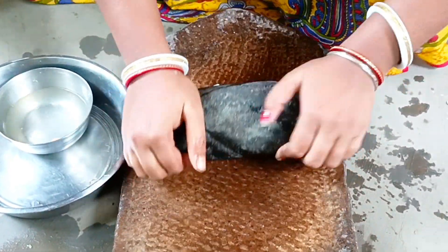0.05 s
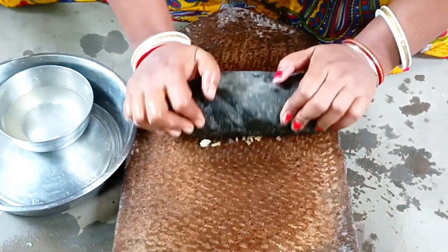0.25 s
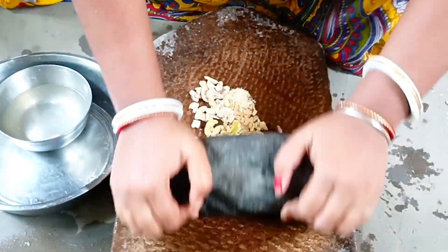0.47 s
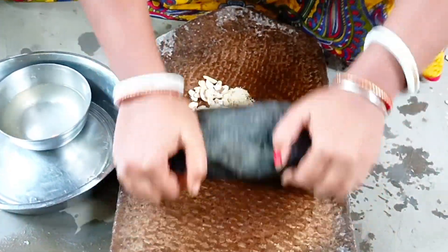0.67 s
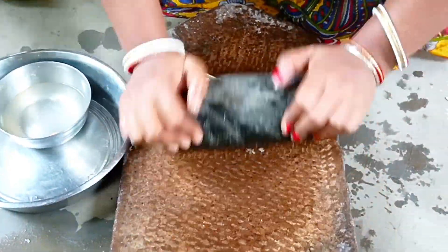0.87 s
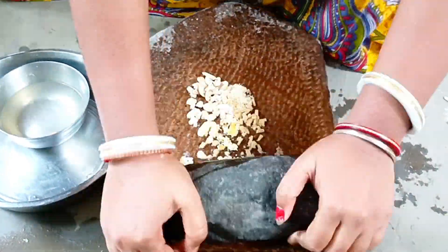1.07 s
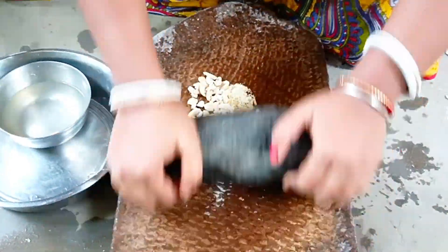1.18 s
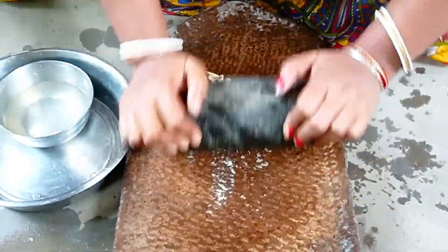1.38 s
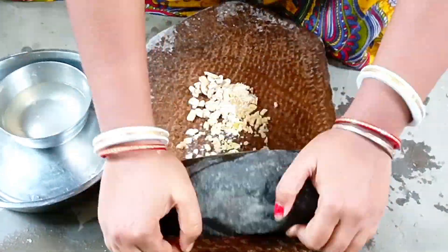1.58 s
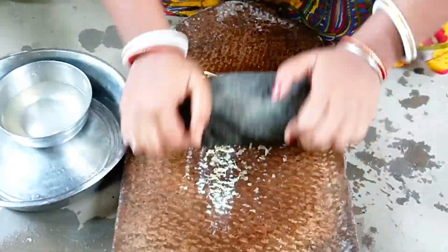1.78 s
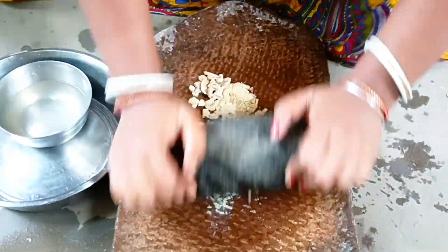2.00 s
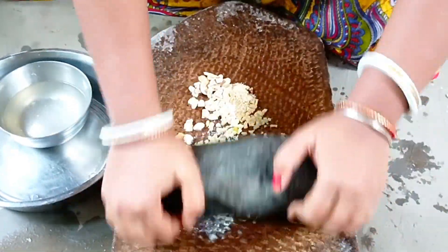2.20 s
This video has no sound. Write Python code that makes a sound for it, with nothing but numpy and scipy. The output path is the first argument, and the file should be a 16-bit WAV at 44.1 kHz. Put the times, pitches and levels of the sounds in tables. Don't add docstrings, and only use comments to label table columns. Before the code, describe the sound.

Stone grinding on stone, quick gritty strokes with hard hollow knocks, crushing dry food up close

```python
import sys
import numpy as np
from scipy import signal
from scipy.fft import rfft, irfft, next_fast_len
from scipy.io import wavfile
from scipy.ndimage import map_coordinates

SR = 44100
rng = np.random.default_rng(int(sys.argv[2]) if len(sys.argv) > 2 else 0)


def boost_factor(decibels):
    exponent = np.asarray(decibels, float) / 20
    return 10 ** exponent


def output_pcm(signal):
    pcm = np.clip(np.atleast_2d(signal).T, -1, 1) * 32767
    wavfile.write(sys.argv[1], SR, np.round(pcm).astype(np.int16))


N = 99225

# start in seconds, length in seconds, level in dB,
# roller ring in dB.
CHATTER_STROKES = [(-.06, 0.13, -27, -7), (0.248, 0.09, -30, -15), (0.361, 0.17, -27, 6),
                   (0.567, 0.098, -31.5, 8.5), (0.614, 0.12, -22, 0.5), (0.842, 0.023, -55, 25),
                   (0.876, 0.12, -25, -16), (0.944, 0.097, -29.5, 6), (1.105, 0.17, -24.5, 3),
                   (1.284, 0.068, -30.5, -25), (1.428, 0.024, -19, -26), (1.483, 0.087, -32, 5.5),
                   (1.628, 0.083, -27, -4.5), (1.752, 0.15, -26, -14), (1.869, 0.21, -25.5, -22),
                   (2.048, 0.082, -42.5, 1.5), (2.181, 0.042, -36.5, 4.5)]
# start in seconds, length in seconds, level in dB,
# cut of the low grit in dB (higher is brighter).
CRUSH_STROKES = [(-.05, 0.2, -84, -24), (.255, 0.19, -44.5, -15), (.4, 0.076, -88, -1),
                 (.72, 0.12, -58, 12), (.835, 0.12, -42, -17), (.9, 0.12, -35.5, -0.5),
                 (1.2, 0.11, -45, -3), (1.29, 0.048, -49.5, -13), (1.345, 0.16, -42, -15),
                 (1.43, 0.15, -38, 2), (1.7, 0.14, -45, -4), (1.815, 0.052, -40, -8),
                 (1.885, 0.14, -43.5, -19.5), (1.97, 0.12, -37.5, -2.5), (2.12, 0.053, -63, -8),
                 (2.19, 0.19, -47.5, -2)]
# start in seconds, peak in dB,
# pitch in Hz, t60 in seconds.
REBOUNDS = [(.010, -24.5, 697, 0.19), (0.013, -23.5, 983, 0.065), (0.211, -19, 259, 0.13),
            (.228, -14, 974, 0.044), (.285, -30.5, 630, 0.098), (.396, -4, 689, 0.05),
            (.42, -12.5, 590, 0.049), (.448, -24, 637, 0.05), (.484, -17.5, 686, 0.078),
            (.575, -31, 710, 0.077), (.626, -18, 940, 0.1), (0.644, -14, 468, 0.017),
            (.664, -11, 916, 0.11), (.698, -14.5, 922, .07), (0.901, -8.5, 593, 0.025),
            (.935, -3.5, 924, 0.052), (0.952, -10, 930, 0.034), (0.973, -13.5, 540, 0.091),
            (.989, -9.5, 580, 0.045), (1.010, -11, 665, 0.054), (1.024, -22, 630, 0.19),
            (1.051, -26, 564, 0.054), (1.142, -15.5, 1010, 0.043), (1.192, -11.5, 896, 0.035),
            (1.214, -14, 973, 0.07), (1.325, -13, 348, 0.026), (1.432, -13.5, 313, 0.03),
            (1.448, -10.5, 967, 0.044), (1.528, -10, 556, 0.03), (1.534, -18.5, 2320, 0.042),
            (1.549, -15, 593, .05), (1.564, -22.5, 665, .06), (1.649, -11.5, 399, 0.038),
            (1.661, -14.5, 406, 0.066), (1.670, -17.5, 1000, 0.028), (1.671, -17, 2390, 0.024),
            (1.680, -15.5, 397, 0.019), (1.823, -12, 910, 0.028), (1.854, -13, 1153, 0.053),
            (1.913, -13.5, 920, 0.027), (1.955, -8.5, 597, 0.043), (1.963, -13, 2330, 0.019),
            (1.977, -12, 905, 0.085), (1.986, -12.5, 927, 0.029), (1.996, -16, 912, 0.052),
            (2.021, -17, 2420, 0.018), (2.103, -27.5, 708, 0.037), (2.167, -21, 408, 0.067),
            (2.209, -29, 680, 0.05), (2.211, -23, 2345, 0.026)]
# start in seconds, peak in dB, pitch in Hz.
TICKS = [(.151, -35, 4840), (0.184, -28, 3000), (.197, -42, 8060), (.265, -35.5, 3900), (.750, -53, 9000),
         (0.774, -40.5, 8000), (.842, -33.5, 11700), (0.859, -22.5, 3000), (1.308, -32.5, 4900),
         (1.352, -31, 12000), (1.53, -28.5, 9000), (1.829, -29, 5100), (1.998, -17, 5700),
         (2.051, -43, 11900), (2.056, -27.5, 9000), (2.138, -46, 9000)]
# start in seconds, peak in dB, loudest slab pitch in Hz,
# roller ring in dB.
KNOCKS = [(.208, 7.5, 1222, 7.5), (0.3457, -2.5, 1000, 6.5), (.379, 10.5, 1310, 4.5), (.661, -17.5, 960, 8),
          (.744, -8.5, 850, -17), (.788, 2, 1110, 3), (0.837, -16.5, 530, -17), (.893, -1.5, 1000, -2),
          (.923, -4.5, 855, -1), (.930, -3, 950, 4.5), (0.972, -12, 597, 9.5), (1.0, -7, 740, -3),
          (1.118, -18, 430, -25), (1.177, -11, 860, 4), (1.283, -20, 357, 5.5), (1.3171, -7.5, 1080, -18),
          (1.364, -13.5, 446, -3), (1.4282, 3, 1060, 5), (1.5108, -2.5, 663, 0.5), (1.632, -24.5, 680, -22),
          (1.766, -18, 830, 7), (1.796, -16, 910, -14), (1.837, -2.5, 1104, 1.5), (1.894, -11, 880, -31),
          (1.944, -1, 1110, -6), (2.082, -18.5, 684, -3), (.858, -16.5, 900, 6.5), (2.192, -21, 677, 8)]
# pitch in Hz, level in dB, t60 in seconds.
ROLLER_MODES = [(929.3, -8, 0.048), (2272, -10, 0.015), (2350, -6, 0.031), (2439, -13.5, 0.025),
                (2670, -22.5, 0.06), (4573, -19.5, 0.018), (5140, -31.5, 0.017), (7270, -34, 0.02),
                (9900, -27, 0.011)]
# pitch in Hz, level in dB, t60 in seconds.
SLAB_MODES = [(259, -9.5, 0.091), (347.5, -7.5, 0.093), (415.5, -6, 0.084), (465, 1, 0.088),
              (554, -1.5, 0.096), (628, 0, 0.084), (688.8, -1.5, 0.11), (810, 2, 0.013),
              (1000, -1.5, 0.055), (1178, 9, 0.019), (1310, -2, 0.038), (1550, -3, 0.045),
              (1694, -3.5, 0.046), (2008, -8, 0.026)]
# frequency in Hz, level in dB.
SCRAPE_COLOUR = [(80, -48), (200, -15.5), (600, 3.5), (2500, -11), (3200, -18), (6000, -33), (10000, -33),
                 (12000, -60)]
# frequency in Hz, level in dB per Hz.
GRIT_COLOUR = [(700, -18), (1500, 0), (3000, 1), (5000, -3.5), (6500, -8.5), (8500, 2), (11000, -9),
               (15000, -13.5)]
# frequency in Hz, level in dB.
THUD_COLOUR = [(25, -42), (50, -15.5), (97, 12.5), (140, 0), (200, 8), (300, -48)]
# frequency in Hz, level in dB.
AIR_COLOUR = [(24, -41), (40, -6), (352, -13), (932, -24.5), (1140, -17), (2870, -27), (5920, -40.5),
              (8620, -38.5), (15700, -58)]
# frequency in Hz, left-right likeness from 0 to 1.
LIKENESS = [(100, 0.93), (500, 0.76), (2000, 0.09), (5000, 0.13), (9000, 0.049)]
# frequency in Hz, t60 in seconds.
ROOM_DECAY = [(200, 0.2), (2000, 0.2), (8000, 0.17)]
# frequency in Hz, left over right in dB, left lead in radians.
PORTS = [(250, -3, 0.12), (450, -1, 0.07), (885, 5.5, 0.2), (1200, -2.5, 0.99), (2420, 3.5, 0.49),
         (9000, -7.5, 1.9)]

PITS_PER_S, PIT_SCATTER_DB = 1500, 3.5
GRITS_PER_S, GRIT_SCATTER_DB = 2800, 9
FALL_DB, BELOW_DB = 10.5, 0.5
GRIP_T60_S, GRIP_SHARE = 0.13, 0.89
NEIGHBOUR_STEP, NEIGHBOUR_DB = 0.11, -12.5
LIGHT_HZ = 157
TOP_HZ = 15800


def unit(x):
    return x / np.sqrt(np.mean(x ** 2) + 1e-20)


def along(points, hz):
    f, value = np.transpose(points)
    return np.interp(np.log(hz + 1), np.log(f + 1), value)


def wobble(rate):
    return map_coordinates(rng.standard_normal(1000), [np.arange(N) * rate / SR])


def filtered(x, response):
    m = next_fast_len(N + SR // 2)
    return irfft(rfft(x, m) * response(np.fft.rfftfreq(m, 1 / SR)), m)[..., :N]


def place(out, start_s, sound):
    out[:, round(start_s * SR):][:, :sound.shape[1]] += sound


def grains(per_s, scatter_db):
    happens = rng.random((2, N)) < per_s / SR
    size = boost_factor(scatter_db * np.minimum(rng.exponential(size=(2, N)), 3.04))
    return unit(happens * size * np.sign(rng.standard_normal((2, N))))


def spread(pair, colour):
    def response(hz):
        turn = np.arccos(np.clip(along(LIKENESS, hz), -1, 1)) / 2
        return boost_factor(along(colour, hz)) * [np.cos(turn), np.sin(turn)]

    mid, side = filtered(pair, response)
    return unit(np.array([mid + side, mid - side]))


def strokes(rows, lag_s=0, sharp=1.73, rise=0.72):
    start, length, db, extra_db = np.transpose(rows)[:, :, None]
    progress = np.clip((np.arange(N) / SR - start - lag_s) / length, 0, 1)
    return np.abs(np.sin(np.pi * progress ** rise)) ** sharp * boost_factor(db), extra_db


def ring(modes, db, t):
    hz, _, t60 = np.transpose(modes)[:, :, None]
    at, pan_db, lead = np.transpose(PORTS)
    side = np.array([.5, -.5])[:, None, None]
    wave = np.sin(2 * np.pi * hz * t + side * np.interp(hz, at, lead))
    level = boost_factor(db[:, None] + side * np.interp(hz, at, pan_db) - 60 * t / t60)
    attack = 1 - np.exp(-t / 0.0012)
    return (level * wave).sum(1) * attack


def burst(hz, wide, t60, t):
    edges = np.clip([hz / (1 + wide), hz * (1 + wide)], 50, TOP_HZ)
    puff = rng.standard_normal((2, len(t))) * boost_factor(-60 * t / t60)
    sos = signal.butter(4, edges, "bandpass", fs=SR, output="sos")
    a, b = signal.sosfilt(sos, puff)
    return np.array([a + 0.12 * b, a - 0.81 * b]) / np.abs(a).max()


def chatter():
    t = np.arange(SR // 8) / SR
    shape, roller_db = strokes(CHATTER_STROKES)
    clumps = boost_factor(1.8 * np.array([wobble(44.844), wobble(45.44)]))
    taps = grains(PITS_PER_S, PIT_SCATTER_DB) * clumps
    push = shape.sum(0)
    out = boost_factor(-8.5) * push * spread(taps + 3.3 * rng.standard_normal((2, N)), SCRAPE_COLOUR)

    slab_drive = push * taps[0]
    rub = unit(taps[1] + 2.9 * rng.standard_normal(N))
    roller_drive = (shape * boost_factor(roller_db)).sum(0) * rub
    for modes, drive in ((SLAB_MODES, slab_drive), (ROLLER_MODES, roller_drive)):
        bodies = [ring([mode], np.array(mode[1:2]), t) for mode in modes]
        size = np.linalg.norm(sum(bodies)[0])
        for body in bodies:
            shifting = drive * boost_factor(1.8 * wobble(24.89))
            out += boost_factor(-3.5) * signal.oaconvolve(shifting[None], body / size, axes=1)[:, :N]
    return out


def crush():
    shape, bright_db = strokes(CRUSH_STROKES, sharp=1.6, rise=0.94)
    grit = 0.61 * grains(GRITS_PER_S, GRIT_SCATTER_DB) + rng.standard_normal((2, N))
    fizz = spread(grit, GRIT_COLOUR) * boost_factor(0.95 * wobble(35.73))
    low = filtered(fizz, lambda hz: 1 / (1 + (hz / 5500) ** 4))
    low_gain = (shape * boost_factor(-bright_db)).sum(0)
    high_gain = shape.sum(0) * boost_factor(2.2 * wobble(59.6))
    return low_gain * low + high_gain * (fizz - low)


def floor():
    push = boost_factor(-53.5) + boost_factor(-6.5) * strokes(CRUSH_STROKES, lag_s=0.034)[0].sum(0)
    thud = push * boost_factor(2.3 * wobble(14.14)) * spread(rng.standard_normal((2, N)), THUD_COLOUR)
    return thud + boost_factor(-47) * spread(rng.standard_normal((2, N)), AIR_COLOUR)


def rebounds():
    out, t = np.zeros((2, N + SR)), np.arange(SR // 8) / SR
    for start, db, hz, t60 in REBOUNDS:
        modes = [(hz * (1 + k * NEIGHBOUR_STEP), 0, t60 / (1 + abs(k))) for k in (-1, 0, 1)]
        place(out, start, ring(modes, db + NEIGHBOUR_DB * np.array([1, 0, 1]), t))
    return out[:, :N]


def ticks():
    out, t = np.zeros((2, N + SR)), np.arange(SR // 40) / SR
    for start, db, hz in TICKS:
        place(out, start, boost_factor(db) * burst(hz, wide=0.75, t60=0.029, t=t))
    return out[:, :N]


def knocks():
    out, t = np.zeros((2, N + SR)), np.arange(SR // 5) / SR
    slab, roller = np.array(SLAB_MODES), np.array(ROLLER_MODES)
    grip = 1 - GRIP_SHARE + GRIP_SHARE * boost_factor(-60 * t / GRIP_T60_S)
    soft_db = -10 * np.log10(1 + (roller[:, 0] / 3000) ** 8)
    for start, db, hz, roller_db in KNOCKS:
        chance, shift = rng.standard_normal((2, len(slab) + len(roller)))
        modes = np.concatenate([slab, roller])
        modes[:, 0] *= 1 + 0.016 * shift
        octaves = np.log2(slab[:, 0] / hz)
        slab_level = slab[:, 1] - FALL_DB * abs(octaves) + BELOW_DB * np.minimum(octaves, 0)
        roller_level = roller[:, 1] + roller_db + soft_db
        levels = np.concatenate([slab_level, roller_level]) + 2 * chance
        body = boost_factor(-5.5) * grip * ring(modes, levels, t)
        crack = boost_factor(-7) * burst(hz, wide=1, t60=0.025, t=t)
        place(out, start, boost_factor(db) * (body + crack))
    return out[:, :N]


def room(x):
    hz, t, z = signal.stft(rng.standard_normal((2, SR // 2)), SR, nperseg=256)
    turn = np.arccos(np.clip(along(LIKENESS, hz), -1, 1))[:, None] / 2
    side = np.array([1, -1])[:, None, None]
    z = np.cos(turn) * z[0] + side * np.sin(turn) * z[1]
    decay = boost_factor(-60 * t / along(ROOM_DECAY, hz)[:, None])
    tail = signal.istft(z * decay, SR, nperseg=256)[1]
    delayed = np.pad(x, (200, 0))
    return signal.fftconvolve(delayed[None], tail / np.linalg.norm(tail[0]), axes=1)[:, :N]


def scene():
    stones = rebounds() - knocks() + chatter()
    stones = filtered(stones, lambda hz: (1j * hz / (LIGHT_HZ + 1j * hz)) ** 2)
    near = stones + crush() + ticks()
    return near + boost_factor(-10.5) * room(near.mean(0)) + floor()


def low_pass(x):
    return signal.sosfilt(signal.butter(12, 16990, fs=SR, output="sos"), x)


def record(dry):
    x = filtered(dry, lambda hz: hz < TOP_HZ)
    knee = 61
    clipped = x / (1 + np.abs(x) ** knee) ** (1 / knee)
    return low_pass(clipped)


dry = scene()
out = record(dry)
output_pcm(out)
```